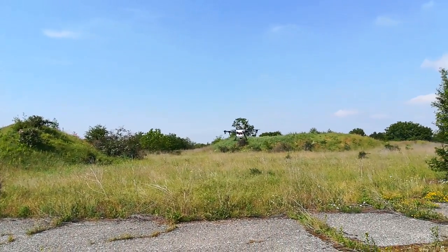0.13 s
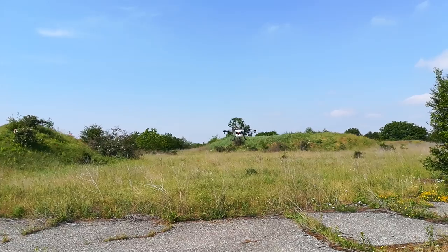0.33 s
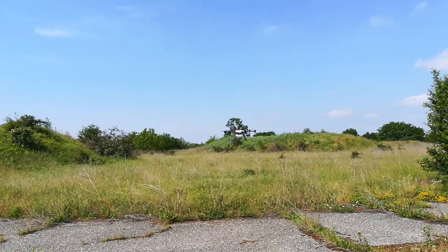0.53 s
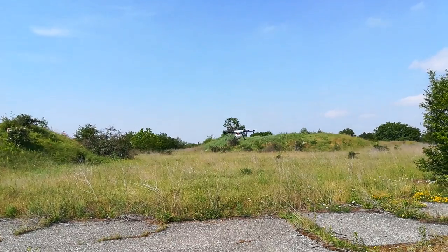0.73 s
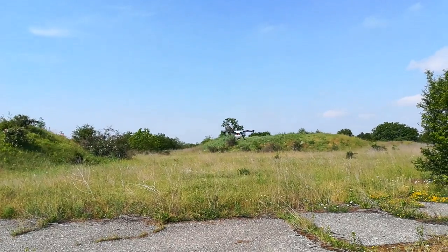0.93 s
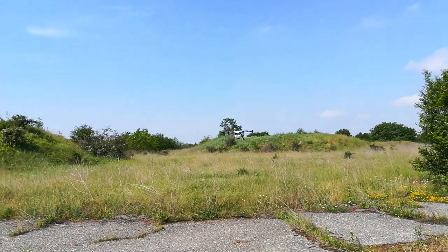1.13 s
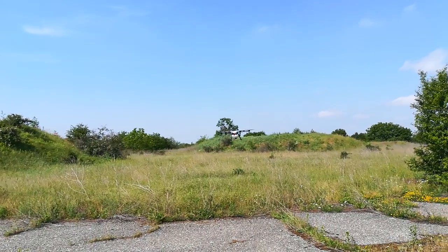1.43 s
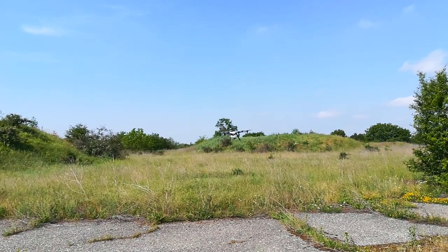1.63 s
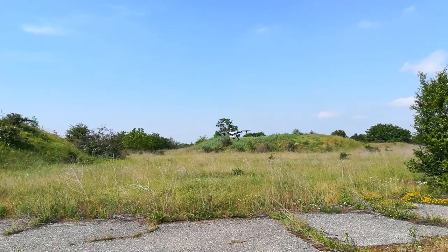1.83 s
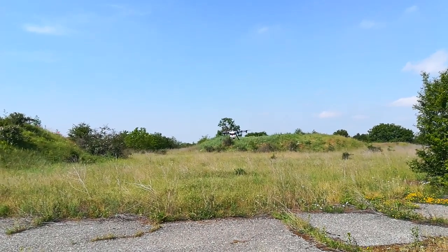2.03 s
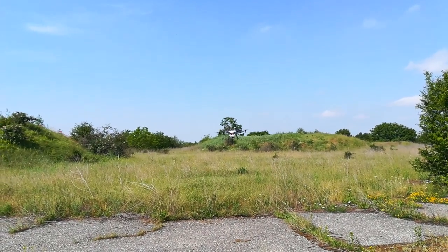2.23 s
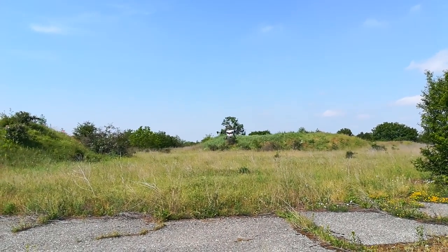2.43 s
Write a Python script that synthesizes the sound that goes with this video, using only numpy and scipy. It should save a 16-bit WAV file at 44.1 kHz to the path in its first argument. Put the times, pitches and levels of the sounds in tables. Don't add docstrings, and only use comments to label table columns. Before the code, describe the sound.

Multi-rotor drone hovers with a steady buzzing hum and thin high whine, faint bird chirps behind

```python
import sys
import numpy as np
from scipy import signal
from scipy.fft import rfft, irfft, next_fast_len
from scipy.io import wavfile
from scipy.ndimage import map_coordinates

SR = 44100
rng = np.random.default_rng(int(sys.argv[2]) if len(sys.argv) > 2 else 0)


def gain_from_decibels(decibels):
    exponent = np.asarray(decibels, float) / 20
    return 10 ** exponent


def to_wav(s):
    ch = np.atleast_2d(s).T
    pcm = np.round(np.clip(ch, -1, 1) * 32767)
    wavfile.write(sys.argv[1], SR, pcm.astype(np.int16))


N = 114219

# (time [s], blade pass rate [Hz])
SPEED_A = [(0.0, 94.33), (0.15, 94.15), (0.2, 94.88), (0.37, 92.83), (0.5, 94.06), (0.56, 93.16),
           (0.62, 93.51), (0.72, 92.78), (0.8, 94.05), (0.88, 93.0), (1.05, 95.26), (1.23, 96.44),
           (1.43, 95.02), (1.58, 95.04), (2.17, 96.02), (2.38, 95.5), (2.5, 95.54), (2.59, 95.46)]
SPEED_B = [(0.0, 92.29), (0.18, 89.69), (0.47, 89.12), (0.5, 89.34), (0.57, 91.16), (0.62, 90.88),
           (0.69, 91.62), (0.99, 89.3), (1.07, 89.49), (1.17, 87.96), (1.36, 90.6), (1.65, 91.76),
           (1.83, 92.06), (2.0, 91.07), (2.2, 91.32), (2.29, 91.63), (2.37, 92.87), (2.59, 91.78)]
SPEED_C = [(0.0, 87.59), (0.24, 88.99), (0.74, 88.86), (0.88, 88.86), (0.94, 88.8), (1.08, 88.55),
           (1.16, 88.38), (1.27, 87.66), (1.39, 86.89), (1.5, 86.06), (1.73, 88.36), (1.82, 86.63),
           (1.96, 88.56), (2.12, 87.84), (2.3, 88.42), (2.38, 87.13), (2.5, 88.97), (2.59, 89.41)]
SPEED_D = [(0.0, 100.73), (0.2, 100.64), (0.35, 102.04), (0.49, 101.41), (0.7, 101.78), (0.8, 101.17),
           (0.9, 101.53), (1.12, 99.8), (1.43, 99.2), (1.65, 98.68), (1.87, 99.62), (1.96, 98.69),
           (2.1, 98.86), (2.2, 98.17), (2.28, 98.34), (2.37, 99.24), (2.48, 98.25), (2.59, 98.0)]
SPEED_E = [(0.0, 93.89), (0.43, 91.57), (0.86, 95.15), (1.29, 90.13), (1.73, 92.94), (2.16, 91.75),
           (2.59, 91.68)]
SPEED_F = [(0.0, 89.55), (0.37, 97.35), (0.74, 94.32), (1.11, 96.43), (1.48, 94.75), (1.85, 95.97),
           (2.22, 95.69), (2.59, 93.79)]
# (blade angle at start [turns], level [dB], octave angle [turns], octave level [dB])
BLADE_TONES = [(0.24, -58.9, -0.02, -76.7), (0.12, -60.4, 0.38, -73.4), (0.18, -70.2, 0.45, -75.9),
               (0.44, -54.5, -0.15, -60.2), (0.36, -58.1, 0.29, -69.4), (0.1, -72.5, -0.09, -60.7)]
# (multiple of the pass rate, level at start [dB], angle [turns])
BLADE_OVERTONES = [(3, -70.5, 0.43), (4, -75.5, 0.29), (6, -70, 0.31), (7, -65.5, 0.77), (8, -69, 0.51),
                   (9, -68, 0.53), (10, -86, 0.39)]
# (level at start [dB], drift [dB/s])
BEARING = [(0, 2.5), (1, -1), (-3, -1.2), (0, 0), (-3, -.4), (-3, 1)]
# (time [s], level [dB])
SLOT_WHINE_A = [(0, -46.5), (.12, -39.5), (.2, -48), (.53, -40), (.89, -45), (.96, -47.5), (1.2, -52),
                (1.36, -61), (1.9, -55), (2.58, -68)]
SLOT_WHINE_B = [(0.0, -80), (0.46, -45.5), (0.6, -82), (0.8, -71), (0.9, -66), (0.98, -44), (1.1, -39.5),
                (1.15, -42), (1.23, -35), (1.31, -48), (1.44, -59), (2.58, -83)]
SLOT_WHINE_C = [(0, -53), (.43, -47.5), (.62, -95), (.86, -43.5), (1.1, -68), (1.45, -60), (1.6, -59),
                (1.72, -41.5), (1.81, -55), (1.961, -39), (2.09, -53), (2.3, -44), (2.39, -53),
                (2.49, -38.5), (2.58, -48.5)]
SLOT_WHINE_DEF = [-68.5, -81, -79]
# (time [s], rotor A level [dB], rotor B level [dB], rotor D level [dB])
POLE_WHINE = [(0, -49, -49, -53), (.1, -54, -47, -60), (.2, -53, -51, -57), (.4, -77, -57, -55),
              (.55, -70, -53.5, -57), (.65, -75, -63, -59), (.75, -86, -54.5, -55), (1.2, -77, -50, -60),
              (1.33, -65, -51.5, -60), (1.6, -57, -54, -65), (1.85, -58, -51, -58), (1.95, -79, -52.5, -77),
              (2.1, -77, -53, -66), (2.35, -70, -53, -68), (2.59, -74, -51, -87)]
# (time [s], rotor wash level [dB], frame ring level [dB])
FLIGHT_LEVELS = [(0.0, -45, -41.5), (.3, -46.5, -42), (.6, -49, -43.5), (.85, -49, -44),
                 (1.1, -52.5, -45.5), (1.13, -50, -46.5), (1.26, -53, -45.5), (1.4, -51, -47.5),
                 (1.55, -52.5, -49.5), (1.9, -51, -46), (2.2, -52.5, -46), (2.59, -56, -46.5)]
# (centre [Hz], width [Hz], level [dB])
FRAME_MODES = [(6173, 105, 2.5), (6536, 197, -1.5), (6580, 1560, -12.5), (3815, 94, -13), (4040, 680, -9.5),
               (2570, 310, -9), (3200, 170, -10.5), (1977, 160, -9.5)]
# (frequency [Hz], density [dB/Hz])
WASH_SPECTRUM = [(100, -7.5), (300, -1), (700, -3.5), (1400, -8.5), (3000, -7), (5000, -7.5), (6000, -30),
                 (12000, -62)]
# (frequency [Hz], left over right [dB])
BODY_SHADE = [(700, 0), (1700, 0), (2100, 6.5), (2750, 6.5), (3800, -0.5), (5200, -6), (6200, -5),
              (9000, -14)]
# (frequency [Hz], lead of the left [rad])
BODY_LEAD = [(700, .1), (1600, .05), (2150, .9), (2750, 0), (3800, -1.5), (5000, -.8), (6300, -.8),
             (9000, -1.5)]
# (frequency [Hz], likeness [0..1])
COHERENCE = [(60, 1), (300, 0.88), (1000, 0.79), (2500, 0.54), (4000, 0.26), (5500, 0.49), (7500, 0.4),
             (10000, 0.057)]
# (time [s], length [s], start pitch [Hz], end pitch [Hz], level [dB])
WHISTLES = [
    (.7, .09, 3300, 2980, -57.5),
    (.935, .032, 2860, 2600, -49),
    (1.117, .058, 2860, 2770, -47),
    (1.25, .06, 2380, 2330, -58),
    (1.255, .06, 5550, 4950, -60),
    (1.31, .08, 4900, 4680, -60.5),
    (1.39, .08, 4700, 4450, -61),
    (1.39, .018, 3200, 3050, -58),
    (1.465, .02, 2780, 2720, -62),
    (1.76, .12, 4200, 4600, -67),
]
# (time [s], length [s], centre [Hz], level [dB])
BIRD_RASPS = [
    (1.078, 0.008, 5100, -49),
    (1.433, 0.0074, 4550, -52),
    (1.375, .012, 4350, -57),
    (2.5, .008, 5000, -66),
]
# (frequency [Hz], density [dB/Hz])
HISS_SPECTRUM = [(20, 4), (70, 3), (300, -15), (5800, -15), (8000, -4), (10500, -12.5), (14500, -12.5),
                 (15600, -9)]

TIME = np.arange(N) / SR
SIDE = np.array([[1], [-1]])

BEAT_DB, OCTAVE_DB = 0.5, 1
OVERTONE_FADE_DB = -2.5
BLADE_FLUTTER_DB, RING_FLUTTER_DB = 2, 1.2
SLOT_ORDER, POLE_ORDER = 70, 42
FLUTTER_DB, SMEAR_RAD = 2.2, 0.33
CHOP, SLAP_DB = 0.8, 1
CRACK_DB, CRACK_SCATTER_DB, CRACK_HZ, CRACK_WIDTH_HZ = -62, 4.5, 1400, 900
GROUND_S, GROUND_GAIN, GROUND_HZ = 0.001176, 0.61, 940
TRILL_HZ, TRILL_DEPTH, WARBLE_RAD, BIRD_LEFT_DB = 66, 0.45, 0.9, 12
RASP_HZ, RASP_WIDTH_HZ = 150, 650
BUZZ_S, BUZZ_LENGTH_S, BUZZ_RATE_HZ = 1.0005, 0.078, 177
BUZZ_HZ, BUZZ_SWEEP_HZ, BUZZ_DB = 5000, 250, -45.5
HISS_DB, HISS_LEFT_DB, HISS_FADE_DB = -56, -6, -1.5
PUFF_S, PUFF_HZ, PUFF_DB = 0.035, 80, -44
TOP_HZ = 15790
PORT_DIP_HZ, PORT_DIP_WIDTH_HZ, PORT_DIP = 5850, 200, 0.41


def unit(x):
    return x / np.sqrt(np.mean(x ** 2) + 1e-20)


def along(points, hz):
    f, v = np.transpose(points)
    return np.interp(np.log(hz + 1), np.log(f + 1), v)


def curves(rows):
    s, *columns = np.transpose(rows)
    return [np.interp(TIME, s, column) for column in columns]


def wobble(rate):
    at = np.arange(0, N + 32, 32)
    knots = rng.standard_normal(2000)
    return np.interp(np.arange(N), at, map_coordinates(knots, [at * min(rate, 700) / SR]))


def filtered(x, response):
    m = next_fast_len(N + SR // 4)
    return irfft(rfft(x, m) * response(np.fft.rfftfreq(m, 1 / SR)), m)[..., :N]


def drone():
    speeds = (SPEED_A, SPEED_B, SPEED_C, SPEED_D, SPEED_E, SPEED_F)
    slot_db = [curves(w)[0] for w in (SLOT_WHINE_A, SLOT_WHINE_B, SLOT_WHINE_C)] + SLOT_WHINE_DEF
    pole_a, pole_b, pole_d = curves(POLE_WHINE)
    pole_db = (pole_a, pole_b, -72, pole_d, -74, -72)
    rotors = [rotor(*parts) for parts in zip(speeds, BLADE_TONES, BEARING, slot_db, pole_db)]
    tones, air, cracks = (sum(part) for part in zip(*rotors))
    wash_db, ring_db = curves(FLIGHT_LEVELS)
    wash = rotor_wash(air, wash_db)
    ring = frame_ring(ring_db)
    same = tones + wake_cracks(cracks) + wash[0] + ring[0]
    return ports(same, wash[1] + 1.16 * ring[1])


def rotor(speed, blade_tones, bearing, slot_db, pole_db):
    start, first_db, octave_start, octave_db = blade_tones
    near_db, turn_db = bearing
    turns = np.cumsum(curves(speed)[0]) / SR

    def tone(order, shift, db):
        return np.sqrt(2) * gain_from_decibels(db) * np.cos(2 * np.pi * (order * turns + shift))

    def smear():
        return SMEAR_RAD * wobble(70) / (2 * np.pi)

    blades = tone(1, start, first_db + BEAT_DB)
    blades += tone(2, octave_start, octave_db + OCTAVE_DB + OVERTONE_FADE_DB * TIME)
    for order, db, shift in BLADE_OVERTONES:
        angle = shift + order * start + 0.11 * wobble(9)
        fade = (OVERTONE_FADE_DB + turn_db) * TIME
        blades += tone(order, angle, db + near_db + fade + BLADE_FLUTTER_DB * wobble(7.78))

    slots = tone(SLOT_ORDER, smear(), slot_db + 1.0 + FLUTTER_DB * wobble(44.95))
    poles = tone(POLE_ORDER, smear(), pole_db + 1.0 + 0.55 * wobble(16))

    count = (turns + start + 1).astype(int)
    slap, scatter = rng.standard_normal((2, 400))[:, count]
    strikes = np.diff((turns + start + 1.5).astype(int), prepend=1)
    cracks = strikes * gain_from_decibels(near_db + turn_db * TIME + CRACK_SCATTER_DB * scatter)
    pulse = 4 * np.sin(np.pi * (turns + start)) ** 8 - 1
    gate = 1 + CHOP * gain_from_decibels(SLAP_DB * slap) * pulse
    return blades + slots + poles, gate * rng.standard_normal((2, N)), cracks


def ground(hz):
    return 1 + GROUND_GAIN / (1 + (hz / GROUND_HZ) ** 2) * np.exp(-2j * np.pi * hz * GROUND_S)


def rotor_wash(air, db):
    wash = unit(filtered(air, lambda hz: gain_from_decibels(along(WASH_SPECTRUM, hz)) * ground(hz)))
    return wash * gain_from_decibels(db - 1.5 + 0.19 * wobble(3.4))


def frame_ring(db):
    def modes(hz):
        return sum(gain_from_decibels(level) / (1 + ((hz - c) / w) ** 2) ** 2 for c, w, level in FRAME_MODES)

    ring = unit(filtered(rng.standard_normal((2, N)), modes))
    return ring * gain_from_decibels(db - 1.0 + RING_FLUTTER_DB * wobble(12.9))


def wake_cracks(impulses):
    def response(hz):
        band = 1 / (1 + ((hz - CRACK_HZ) / CRACK_WIDTH_HZ) ** 4)
        return ground(hz) * band * hz / (hz + CRACK_HZ)

    return gain_from_decibels(CRACK_DB) * unit(filtered(-impulses, response))


def ports(same, other):
    def mixing(hz):
        return np.arccos(np.clip(along(COHERENCE, hz), 0, 1)) / 2

    def body(hz):
        lead = np.exp(0.5j * SIDE * along(BODY_LEAD, hz))
        return gain_from_decibels(SIDE * along(BODY_SHADE, hz) / 2) * lead

    common = filtered(same, lambda hz: body(hz) * np.cos(mixing(hz)))
    return common + filtered(other, lambda hz: SIDE * body(hz) * np.sin(mixing(hz)))


def birds():
    return (whistles() + rasps() + buzz()) * gain_from_decibels(SIDE * BIRD_LEFT_DB / 2)


def whistles():
    x = np.zeros(N)
    for s, length, from_hz, to_hz, db in WHISTLES:
        u = np.clip((TIME - s) / length, 0, 1)
        is_long = length > 0.05
        trill = 1 + TRILL_DEPTH * is_long * np.cos(2 * np.pi * TRILL_HZ * (TIME - s))
        phase = 2 * np.pi * np.cumsum(from_hz + (to_hz - from_hz) * u) / SR
        phase += WARBLE_RAD * is_long * wobble(140)
        x += gain_from_decibels(db) * np.sin(np.pi * u) ** 0.33 * trill * np.sin(phase)
    return x


def rasps():
    x = np.zeros(N)
    for s, length, hz, db in BIRD_RASPS:
        noise = rng.standard_normal(N)
        band = unit(filtered(noise, lambda f: np.exp(-((f - hz) / RASP_WIDTH_HZ) ** 2)))
        swell = np.sin(np.pi * np.clip((TIME - s) / length, 0, 1))
        x += gain_from_decibels(db) * swell * (1 + 0.19 * np.cos(2 * np.pi * RASP_HZ * TIME)) * band
    return x


def buzz():
    u = np.clip((TIME - BUZZ_S) / BUZZ_LENGTH_S, 0, 1)
    cycle = 2 * np.pi * BUZZ_RATE_HZ * (TIME - BUZZ_S)
    pitch = BUZZ_HZ + BUZZ_SWEEP_HZ * np.sin(cycle) + 100 * wobble(60)
    swell = np.sqrt(np.sin(np.pi * u ** 1.5))
    pips = np.cos(cycle / 2) ** 4
    return gain_from_decibels(BUZZ_DB) * swell * pips * np.sin(2 * np.pi * np.cumsum(pitch) / SR)


def port_hiss():
    hiss = unit(filtered(rng.standard_normal((2, N)), lambda hz: gain_from_decibels(along(HISS_SPECTRUM, hz))))
    return gain_from_decibels(HISS_DB + SIDE * HISS_LEFT_DB / 2) * hiss * gain_from_decibels(HISS_FADE_DB * TIME)


def wind_puff():
    puff = unit(filtered(rng.standard_normal(N), lambda hz: 1 / (1 + (hz / PUFF_HZ) ** 4)))
    return gain_from_decibels(PUFF_DB) * puff * np.exp(-(TIME / PUFF_S) ** 2) * [[0.15], [1]]


def scene():
    return drone() + birds() + port_hiss() + wind_puff()


def roll_off(x):
    return signal.sosfilt(signal.butter(12, 16780, fs=SR, output="sos"), x)


def record(dry):
    def response(hz):
        dip = PORT_DIP * np.exp(-((hz - PORT_DIP_HZ) / PORT_DIP_WIDTH_HZ) ** 2)
        return (hz < TOP_HZ) * (1 - dip)

    return roll_off(filtered(dry, response))


dry = scene()
out = record(dry)
to_wav(out)
```